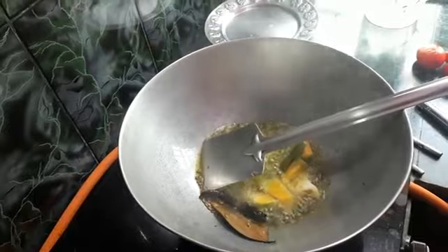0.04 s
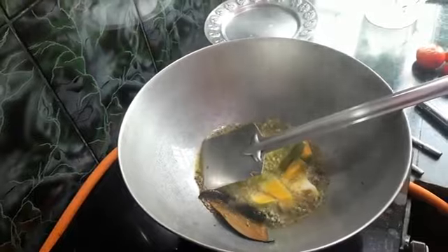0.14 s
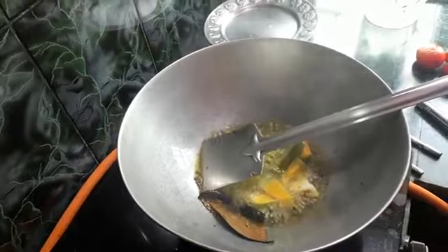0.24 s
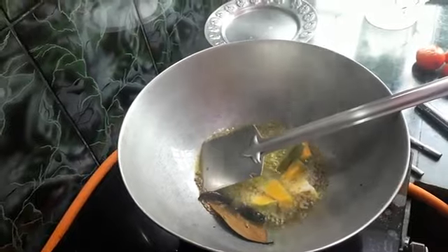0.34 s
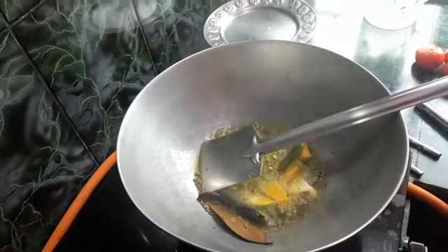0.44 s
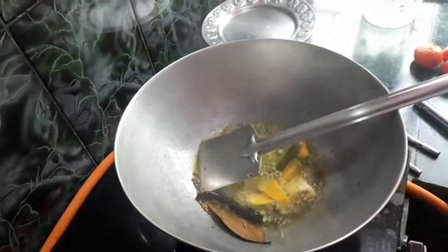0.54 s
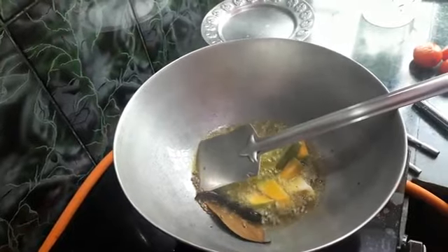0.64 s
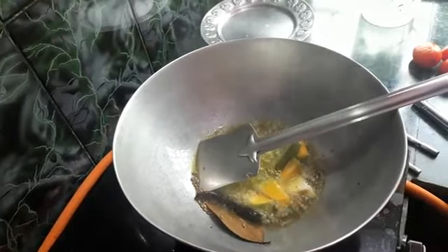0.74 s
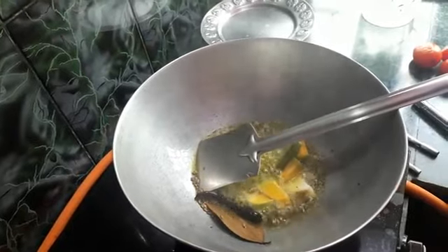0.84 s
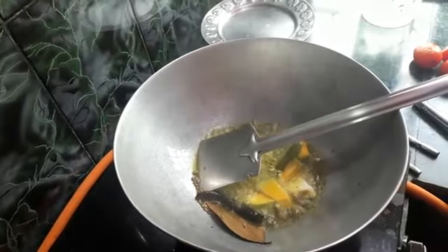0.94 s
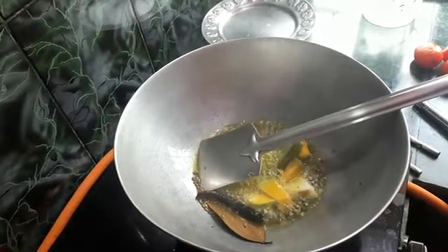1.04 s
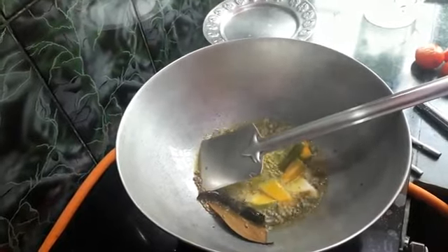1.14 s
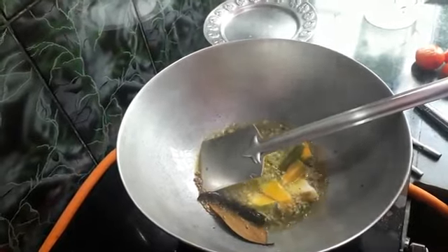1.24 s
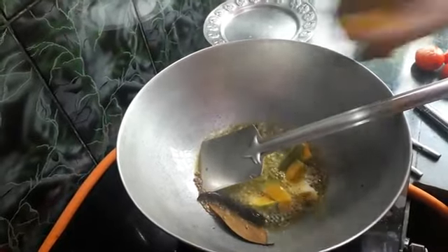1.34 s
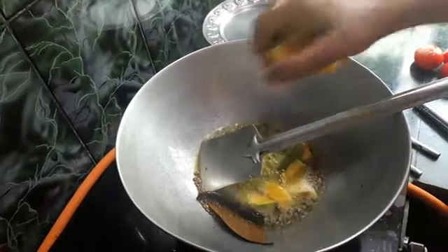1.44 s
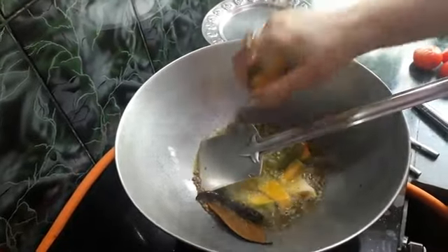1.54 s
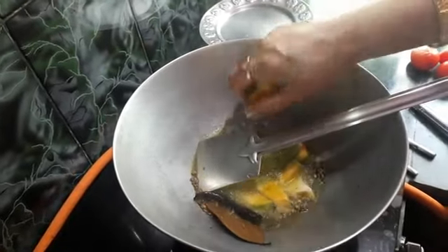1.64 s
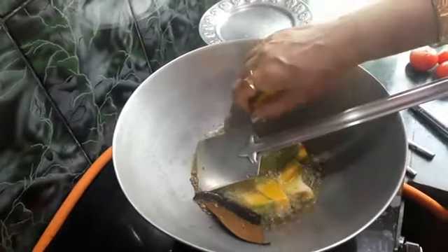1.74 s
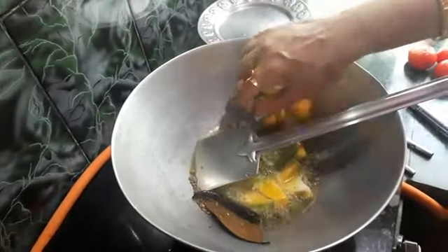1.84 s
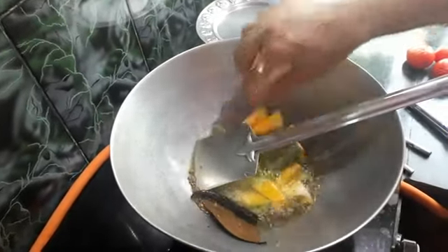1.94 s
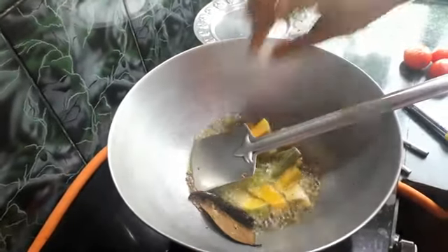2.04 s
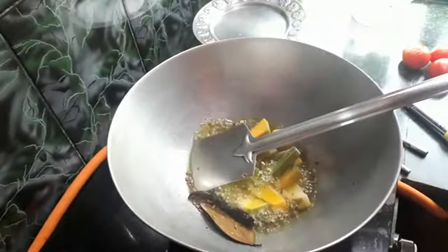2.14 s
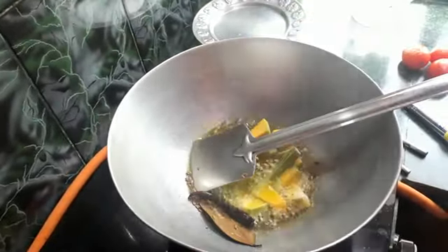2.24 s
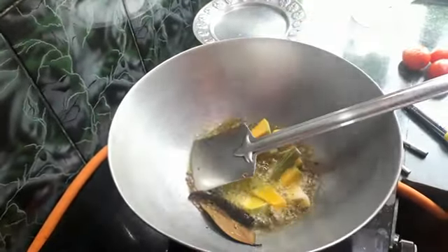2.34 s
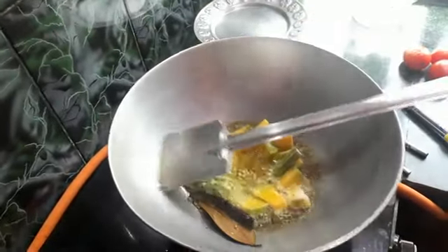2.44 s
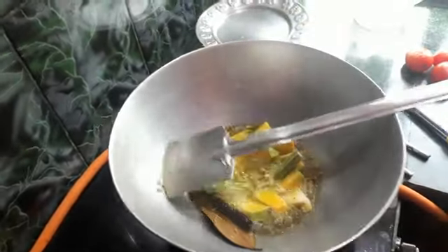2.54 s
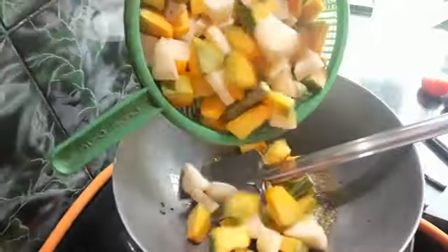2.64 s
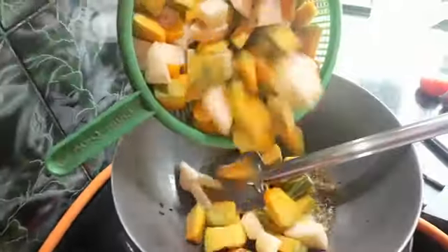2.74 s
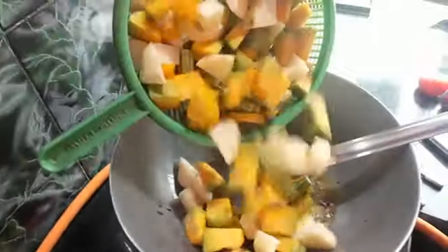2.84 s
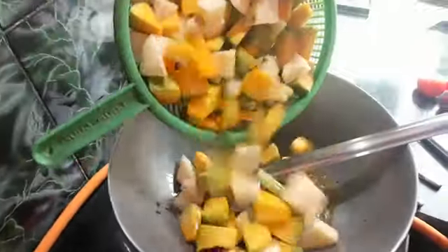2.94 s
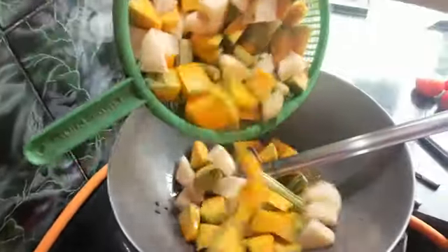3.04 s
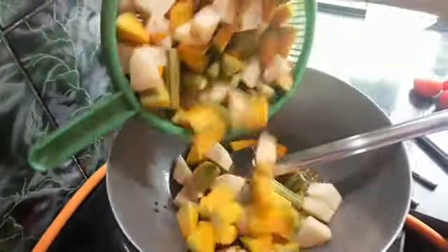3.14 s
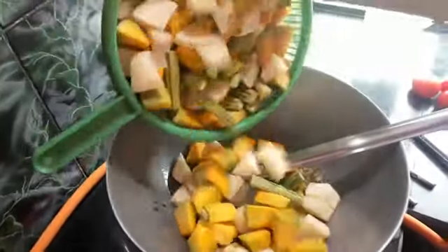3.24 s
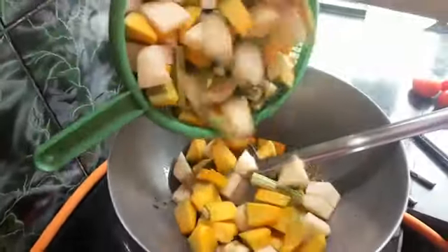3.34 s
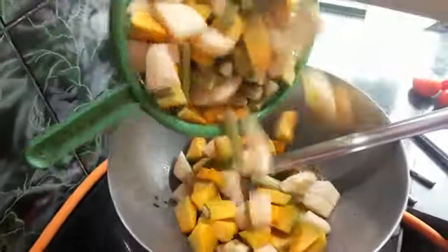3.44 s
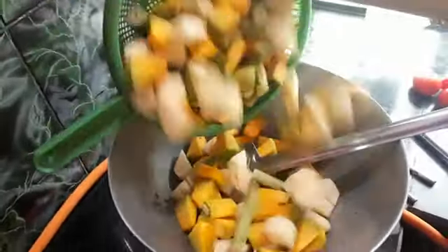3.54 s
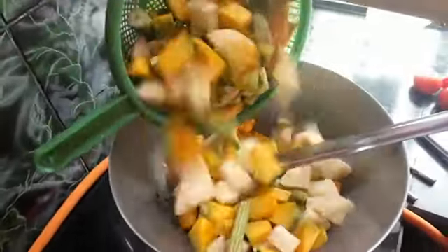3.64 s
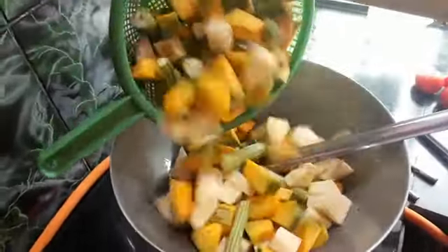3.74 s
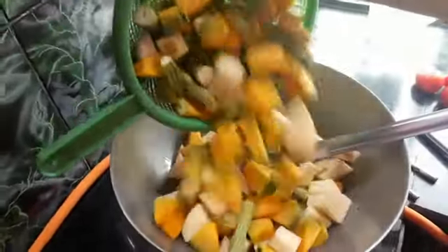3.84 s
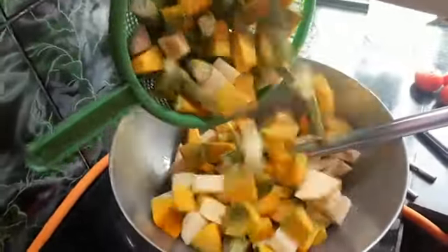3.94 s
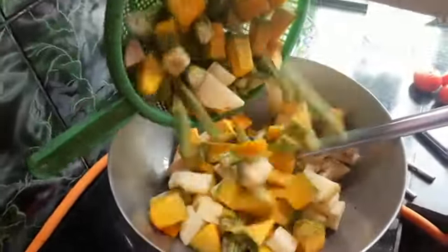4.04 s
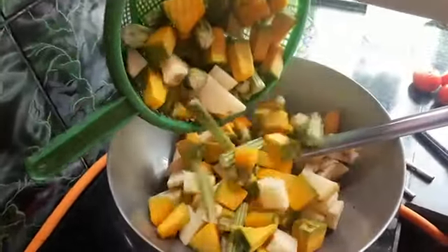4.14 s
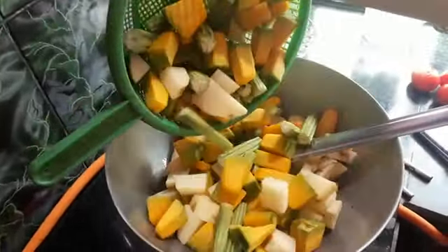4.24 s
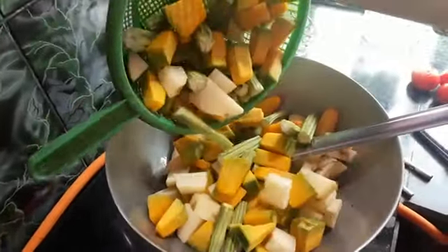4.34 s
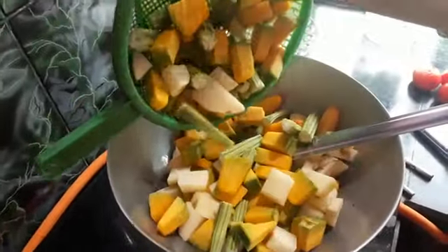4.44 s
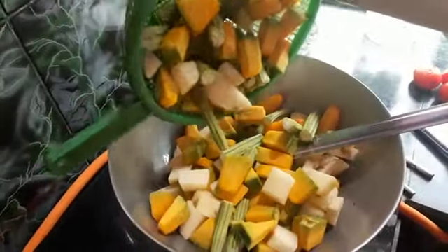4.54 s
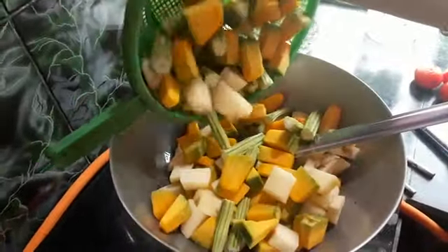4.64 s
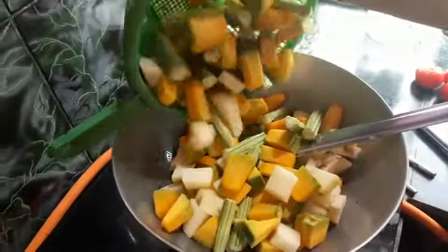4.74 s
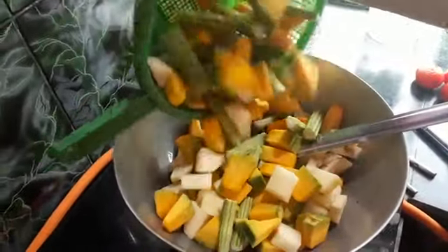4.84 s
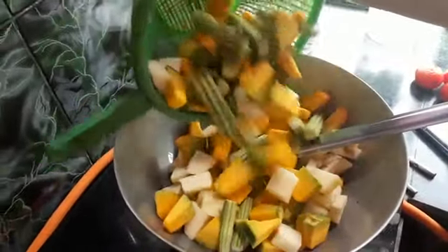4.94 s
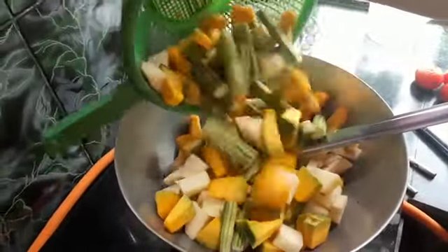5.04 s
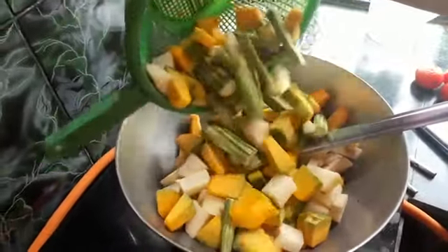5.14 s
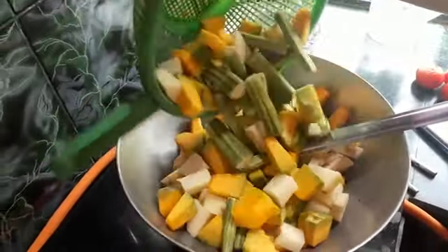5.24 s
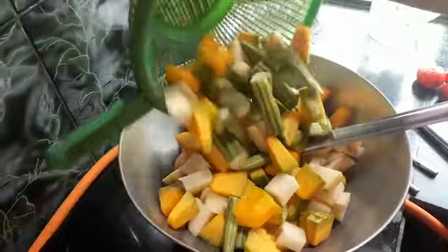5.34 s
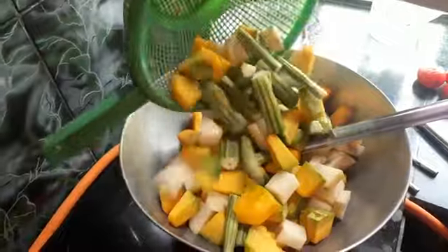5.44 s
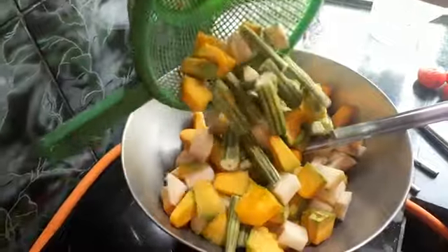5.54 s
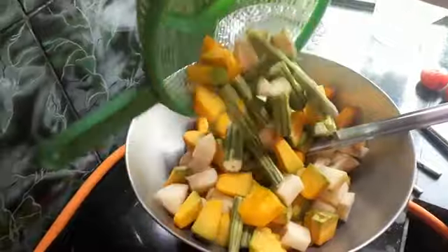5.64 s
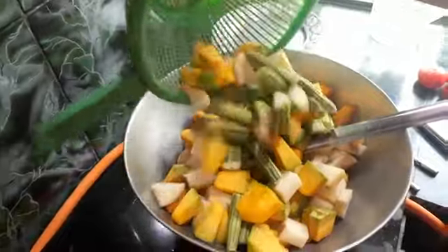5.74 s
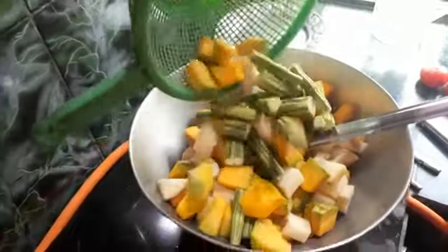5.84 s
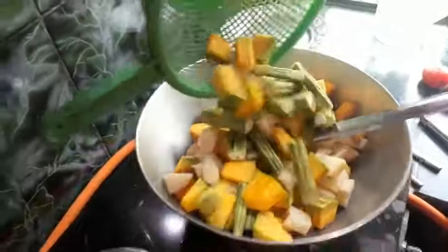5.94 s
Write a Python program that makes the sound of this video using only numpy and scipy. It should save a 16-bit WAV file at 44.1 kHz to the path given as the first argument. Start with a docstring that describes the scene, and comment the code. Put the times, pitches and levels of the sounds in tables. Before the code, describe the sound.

Frying crackle and popping oil come first, over a faint low burner murmur. A handful drops in with small plops and a brighter fizz; a metallic scrape follows, then chopped vegetables rush into the pan with knocks, scraping and short metallic ringing. The pour thins to dull tumbling against vegetables already there, with steadier, stronger sizzling. Near, small microphone, brief kitchen reverberation.

```python
"""Vegetables frying in a thin metal pan

Steam bubbles fizz as shaped noise and decaying pops; louder spits are resonant puffs of noise.
Pieces land as damped swings, vegetables pour in and scrape the pan as clumped slips in short rushes,
and more pieces tumble. Resonators ring the pan wall and hum as the boom of its bowl, over a low murmur
of burner and room. Sparse decaying taps give the brief reverberation of a small hard kitchen."""
import sys
import numpy as np
from scipy import signal
from scipy.fft import next_fast_len
from scipy.io import wavfile
from scipy.ndimage import uniform_filter1d

SR = 44100
rng = np.random.default_rng(int(sys.argv[2]) if len(sys.argv) > 2 else 0)


def dump_mix(stems):
    """Bounce the given channels to the path in sys.argv[1] as a 16-bit WAV at rate SR."""
    frames = np.atleast_2d(stems).T  # one column per channel
    limited = np.clip(frames, -1, 1)  # hard clip at full scale
    pcm = np.round(limited * 32767).astype(np.int16)
    wavfile.write(sys.argv[1], SR, pcm)


N = 264159
BINS = np.fft.rfftfreq(4096, 1 / SR)  # filter design frequencies, f/Hz

# rushes of pieces poured into the pan: start t/s, length t/s, pressure at start level/dB, pressure at end
# level/dB, wall ring re pressure level/dB, edge hiss re pressure level/dB, contact resonance f/Hz,
# boom of the bowl at mean pressure level/dB
POURING_RUSHES = [(2.384, 0.011, -24, -23.5, -6.5, -9, 4960, -42),
                  (2.419, 0.033, -34, -22, -1.5, -6, 4650, -52),
                  (2.458, 0.042, -14.5, -17.5, 1, -1, 2980, -34),
                  (2.502, 0.078, -12.5, -14, -7.5, 1.5, 4820, -28.5),
                  (2.597, 0.058, -17, -27, -3.5, -4, 3670, -42),
                  (2.689, 0.048, -23.5, -21.5, -3.5, -5, 3640, -35),
                  (2.834, 0.018, -19, -19, -7, -4, 2840, -42),
                  (2.867, 0.087, -17, -17, -8.5, -7, 2670, -35),
                  (2.928, 0.052, -15, -18, -5.5, -2.5, 2360, -36),
                  (2.993, 0.15, -26.5, -31.5, -1.5, -6, 3000, -32.5),
                  (3.188, .015, -31, -28.5, 1, -13, 3320, -36),
                  (3.21, 0.015, -15, -24.5, -7, -4.5, 3970, -38),
                  (3.269, 0.045, -32, -31.5, 4.5, -9, 3130, -35),
                  (3.33, 0.08, -30.5, -37, -0.5, -1.5, 3570, -39),
                  (3.461, 0.023, -27, -20, -9, -6, 3190, -41),
                  (3.487, 0.079, -16, -25, -4.5, -4, 3200, -31.5),
                  (3.601, .125, -15, -16.5, -5, -7.5, 3200, -30.5),
                  (3.735, 0.066, -23, -23, -5.5, -9, 3320, -45),
                  (3.811, .072, -18.5, -24, -4.5, -9, 2790, -32),
                  (3.9, 0.052, -26.5, -28, -2.5, -10, 2980, -49),
                  (3.946, 0.078, -14.5, -16, -7.5, -8, 2960, -34),
                  (4.035, 0.088, -31, -19.5, -5, -9, 3000, -37),
                  (4.179, 0.12, -37.5, -39.5, -0.5, -7, 3250, -43),
                  (4.98, .015, -28, -25, -10.5, -6, 2400, -42),
                  (5.066, 0.0098, -25, -28, 0.5, -15, 3420, -43)]
# two spells of pieces shifting and tumbling: t/s, rustle level/dB, boom of the bowl level/dB
TUMBLING = [
    [(1.45, -58, -60), (1.72, -54, -64), (1.83, -38, -46), (1.99, -35.5, -59), (2.01, -26.5, -46),
     (2.06, -36, -47), (2.17, -49, -56), (2.22, -60, -80), (2.36, -64, -80)],
    [(4.33, -40, -54), (4.4, -50, -54), (4.57, -54, -61), (4.75, -44, -67), (4.9, -40, -57),
     (4.99, -33.5, -43), (5.2, -45, -42), (5.3, -42, -49), (5.42, -41.5, -67), (5.47, -33.5, -48),
     (5.55, -36, -45.5), (5.66, -38, -50), (5.78, -41, -55), (5.87, -36.5, -51), (5.99, -43, -50)],
]


def amp(db):
    """The decibel law: 20 dB is a factor of ten in amplitude."""
    return 10 ** (np.asarray(db) / 20)


def unit(x):
    """Normalisation to a root-mean-square value of 1."""
    return x / np.sqrt(np.mean(x ** 2) + 1e-20)


def read(points, hz):
    """Linear interpolation of a spectral curve on a logarithmic frequency axis."""
    f, value = np.transpose(points)
    return np.interp(np.log(hz + 1), np.log(f + 1), value)


def track(tables, axis, rest):
    """Piecewise-linear envelope: one column of several tables along time, at rest between them."""
    t, out = np.arange(N) / SR, np.full(N, float(rest))
    for rows in tables:
        rows = np.array(rows)
        inside = (t >= rows[0, 0]) & (t <= rows[-1, 0])
        out[inside] = np.interp(t[inside], rows[:, 0], rows[:, axis])
    return out


def colour(x, gain_db):
    """Minimum-phase filtering: the Hilbert transform of log gain gives the causal phase."""
    both_sides_db = np.r_[gain_db, gain_db[-2:0:-1]]
    log_gain = np.log(amp(np.maximum(both_sides_db, -100)))
    phase = -signal.hilbert(log_gain).imag
    taps = np.fft.ifft(np.exp(log_gain + 1j * phase)).real
    return signal.oaconvolve(x, taps)[:len(x)]


def mode(x, hz, width):
    """A damped resonator: one complex pole at hz, with gain near 1 at its peak."""
    r = np.exp(-np.pi * width / SR)
    pole = r * np.exp(2j * np.pi * hz / SR)
    return 2 * signal.lfilter([1 - r], [1, -pole], x).real


def resonate(x, hz, width):
    """Heterodyning: shifts a moving hz to zero, smooths and shifts back, a resonance of gain 1."""
    turn = np.exp(2j * np.pi * np.cumsum(hz * np.ones(len(x))) / SR)
    r = np.exp(-np.pi * width / SR)
    return 2 * (turn * signal.lfilter([1 - r], [1, -r], x / turn)).real


def clicks(per_s, spread_db, cap=2.9):
    """Random impulses of either sign at a mean rate, a few of them large."""
    size = amp(spread_db * np.minimum(rng.exponential(1, N), cap))
    return size * rng.choice([-1., 1.], N) * (rng.random(N) < per_s / SR)


def wander(length):
    """Slow random modulation, smooth over about this many seconds."""
    knots = np.arange(0, N / SR + length, length)
    values = rng.standard_normal(10000)[:len(knots)]
    steps = np.interp(np.arange(N) / SR, knots, values)
    return unit(uniform_filter1d(steps, max(round(length * SR / 2), 2)))


def bursts(events, t60, q, wide_db):
    """Impulsive excitation: each event is a puff of noise with a weaker tail, through a resonance."""
    out, t = np.zeros(N + 8000), np.arange(8000) / SR
    fall_db = -60 * np.maximum(t - .002, 0) / t60  # sputters for 2 ms before it fades
    snap = .7 * (t < .001)  # the burst starts hardest
    envelope = amp(fall_db) + amp(-17.5 + 0.1 * fall_db)  # the weak tail fades ten times slower
    for (s, db, hz), noise in zip(events, rng.standard_normal((len(events), 8000))):
        puff = (noise + snap * np.sign(noise)) * envelope
        puff = mode(mode(puff, hz, hz / q), hz, hz / q) + amp(wide_db) * puff
        out[round(s * SR):][:8000] += amp(db) * puff / abs(puff).max()
    return out[:N]


def rushes(gain_db, release_db_per_s):
    """Rush envelope: a fast attack, a slide from first pressure to last, an exponential decay."""
    attack_s = 0.0019
    t, power = np.arange(N) / SR, np.zeros(N)
    for (start, length, first_db, last_db, *_), db in zip(POURING_RUSHES, gain_db):
        now = t[round(start * SR):][:SR // 2] - start
        held_db = np.interp(now, [0, length], [first_db, last_db])
        held_db = held_db - release_db_per_s * np.maximum(now - length, 0)
        level = np.clip(now / attack_s, 0, 1) * amp(held_db + db)
        power[round(start * SR):][:SR // 2] += level ** 2  # overlapping rushes add in power
    return np.sqrt(power)


def rumble():
    """Filtered noise: the low steady murmur of burner and room."""
    # shape of the murmur: f/Hz, relative density level/dB per Hz
    murmur = [(15, -19), (25, -3), (49, -5), (92, 0), (163, -3), (362, -1.5), (408, -6.5), (600, -8.5),
              (780, -3), (1320, -120)]
    return amp(-55) * unit(colour(rng.standard_normal(N), read(murmur, BINS)))


def kitchen(x):
    """Reverberation as convolution with sparse taps of random sign; the treble decays sooner."""
    taps = np.zeros(SR // 2)
    at = np.arange(200, len(taps) - 20, 20)
    taps[at + rng.integers(0, 20, len(at))] = rng.choice([-1., 1.], len(at))
    hz, t, z = signal.stft(taps, SR, nperseg=256)
    t60 = read([(300, 0.79), (3000, 0.39), (12000, 0.23)], hz)  # f/Hz, decay by 60 dB t/s
    tail = signal.istft(z * amp(-60 * t / t60[:, None]), SR, nperseg=256)[1]
    return signal.oaconvolve(x, tail / np.linalg.norm(tail))[:N]


def boom():
    """Modal resonance: random jolts keep the lowest mode of the bowl humming."""
    boom_hz = 119.5
    hum = mode(rng.standard_normal(N), boom_hz, 4.2)
    envelope = abs(signal.hilbert(hum, next_fast_len(N))[:N])
    hum /= envelope ** .8 + 1e-9  # steadier than pure chance
    _, _, first_db, last_db, *_, boom_db = np.transpose(POURING_RUSHES)
    level = rushes(boom_db - (first_db + last_db) / 2, release_db_per_s=300)
    level = level + amp(track(TUMBLING, axis=2, rest=-78))
    return uniform_filter1d(level, size=800) * unit(mode(hum, boom_hz, 52))


def tumble():
    """Random soft impacts, low-passed: wet pieces knock on each other and on the wall."""
    # shape of the rustle: f/Hz, relative density level/dB per Hz
    rustle = [(24, -39), (40, -30), (114, -1.5), (185, -11.5), (324, 2), (366, -6.5), (595, -0.5),
              (830, -7.5), (1500, -25), (1950, -50), (3300, -120)]
    lumps = unit(clicks(600, 2.0)) + 0.33 * rng.standard_normal(N)
    dull = unit(colour(lumps, read(rustle, BINS)))
    level_db = uniform_filter1d(track(TUMBLING, axis=1, rest=-60), size=400)
    return amp(level_db) * dull


def thuds():
    """Damped oscillation: each soft landing is one quickly decaying sinusoid."""
    # soft landings of pieces: t/s, starting level/dB, f/Hz, decay by 60 dB t/s
    landings = [(.720, -16.5, 820, 0.014), (1.494, -22, 248, 0.011), (1.578, -32, 148, 0.031),
                (1.622, -29, 202, 0.022), (1.684, -23, 430, 0.017), (1.692, -21.5, 223, 0.028),
                (1.799, -28, 716, 0.027), (1.849, -23, 204, 0.023), (1.888, -24, 304, 0.038),
                (2.007, -14, 700, 0.028), (2.045, -29, 607, .03), (2.152, -27.5, 162, 0.029),
                (2.459, -16, 264, 0.2), (2.531, -19, 85.5, 0.073), (4.485, -31.5, 177, 0.034),
                (4.601, -33, 483, 0.38), (4.757, -27, 780, 0.034)]
    out, t = np.zeros(N + 8000), np.arange(8000) / SR
    onset = np.minimum(t / 0.00064, 1)
    for s, db, hz, t60 in landings:
        swing = amp(db - 60 * t / t60) * np.sin(2 * np.pi * hz * t)
        out[round(s * SR):][:8000] += swing * onset
    return out[:N]


def knocks():
    """Impact excitation: short broad-band cracks of hard contact, and two early spits of oil."""
    # blows of pieces on the pan, and two spits of oil at 2.374 s and 2.396 s: t/s, peak level/dB, centre f/Hz
    blows = [(2.374, -17, 4800), (2.396, -10.5, 5400), (2.432, -12.5, 574), (2.456, -10, 616),
             (2.697, -10, 790), (2.87, -18, 1950), (3.19, -24, 1190), (3.206, -20, 620), (3.283, -17, 570),
             (3.339, -17, 3100), (3.465, -13.5, 630), (3.487, -8.5, 3060), (3.588, -15.5, 590),
             (3.604, -22, 540), (3.811, -8.5, 1080), (3.815, -4, 2560), (3.945, -4, 2720),
             (3.959, -16, 586), (4.104, -9.5, 930), (4.147, -9.5, 3150), (4.199, -20, 583),
             (4.548, -28, 3960), (4.675, -20, 5040), (4.984, -11.5, 5100), (5.07, -20, 600),
             (5.239, -19.5, 594), (5.535, -20, 595), (5.865, -20, 900)]
    return bursts(blows, t60=0.052, q=2.1, wide_db=-19.0)


def scrape():
    """Sliding friction: poured pieces catch and slip in clumps, through a moving resonance."""
    # shape of the rubbing before it is split in bands: f/Hz, relative density level/dB per Hz
    rub_shape = [(60, -62), (88, -36), (150, -10), (193, -12), (269, -5), (420, -4.5), (522, -4.5),
                 (600, 3.5), (833, -5.5), (1250, -4), (1440, -10.5), (1930, -10), (3670, -12), (5520, -9),
                 (7400, -20), (16000, -32)]
    start, _, _, _, wall_db, hiss_db, contact_hz, _ = np.transpose(POURING_RUSHES)
    latest = np.maximum(np.searchsorted(start, np.arange(N) / SR) - 1, 0)
    contact_hz = contact_hz[latest]

    slips = unit(clicks(1500 * amp(3.5 * wander(.004)), 3.16))
    slips = unit(slips + .5 * rng.standard_normal(N))
    _, _, z = signal.stft(slips, SR, nperseg=512)
    patches = unit(uniform_filter1d(uniform_filter1d(rng.standard_normal(z.shape), 4, 0), 6, 1))
    slips = signal.istft(z * amp(2.7 * patches), SR, nperseg=512)[1][:N]  # the colour flickers

    rub = unit(colour(slips, read(rub_shape, BINS)))
    rub = rub + 0.77 * resonate(rub, contact_hz, 1060)

    def band(edge_hz, kind):
        """Band splitting: one Butterworth band of the rubbing, normalised."""
        return unit(signal.sosfilt(signal.butter(3, edge_hz, kind, fs=SR, output="sos"), rub))

    low, mid, high = band(1450, "low"), band([1450, 9500], "band"), band(9500, "high")
    wall = rushes(wall_db, release_db_per_s=353)
    edge = rushes(np.zeros(len(POURING_RUSHES)), release_db_per_s=600)
    hiss = rushes(hiss_db, release_db_per_s=600)
    return amp(0.94 * wander(0.0074)) * (wall * low + edge * mid + hiss * high)


def pan_ring(x):
    """Modal synthesis: the contact point moves, so each wall mode is fed now more, now less."""
    # modes of the pan wall: f/Hz, gain level/dB
    wall_modes = [(271, 3.5), (333, 0), (580, 4), (625, -1), (673, -3), (791, 5.5), (869, -8), (982, -9),
                  (1141, -15), (1240, -8), (1738, -7), (1908, 2), (1952, 7.5), (2330, 2.5), (2395, 3),
                  (2546, 3), (2891, 3), (3457, 5), (4117, 6), (4460, -17), (4821, -3), (5140, -5),
                  (5460, 7.5), (5600, 5), (6370, -5), (6700, 15), (7190, 14.5), (7670, -8), (8050, -14),
                  (8600, -11)]
    ring = np.zeros(N)
    for hz, db in wall_modes:
        swing_db = 3.0 * np.tanh(wander(.06))
        ring += mode(amp(db + swing_db) * x, hz, 8.9 + hz / 300)
    return ring


def spits():
    """Flash boiling: drops of water turn to steam and throw oil in resonant puffs."""
    # loud spits of oil: t/s, peak before colouring level/dB, centre f/Hz
    loud = [(0.0437, -14, 5640), (0.0504, -13, 5540), (0.0922, -17.5, 3970), (0.158, -26, 5400),
            (0.2344, -18, 4410), (0.2408, -14, 3830), (0.2583, -17, 5470), (0.3214, -17.5, 2950),
            (0.376, -28, 4020), (0.487, -18.5, 5510), (0.5654, -21, 7610), (0.5731, -21, 4800),
            (0.5844, -23, 5350), (0.6054, -23, 5400), (0.625, -17, 4730), (0.6589, -15.5, 2880),
            (0.6952, -19.5, 4300), (0.7205, -19, 2500), (0.7563, -9, 4830), (0.7714, -11, 4870),
            (0.8094, -22, 5510), (0.8477, -23.5, 6730), (0.883, -18, 5470), (0.9523, -20, 6300),
            (0.9854, -23, 5000), (1.1954, -19, 6660), (1.2032, -17.5, 5440), (1.242, -22, 5900),
            (1.291, -14, 3900), (1.3826, -22.5, 7250), (1.51, -24, 4500), (1.5358, -22, 2760),
            (1.575, -24, 4030), (1.6116, -19, 2580), (1.656, -19.5, 5530), (1.6885, -26, 5600),
            (1.7114, -16.5, 5600), (1.8063, -16.5, 5340), (1.828, -22, 5400), (1.9545, -20, 2720),
            (2.0033, -20, 5330), (2.0305, -20, 4040), (2.0453, -13.5, 4020), (2.066, -16, 5050),
            (2.2064, -18, 5100), (2.2497, -16, 3000), (2.2932, -20, 4760), (4.337, -24.5, 2430),
            (4.76, -21, 4160), (5.3892, -27, 2550), (5.521, -20, 2840), (5.663, -20.5, 2750),
            (5.7044, -23, 2510), (5.8087, -26, 2720), (5.905, -21, 4040)]
    when, weak, high = rng.random((50, 3)).T  # the lesser spits come by chance
    small = zip(when * N / SR, -22 - 11 * weak, 2310 + (6000 - 2310) * high)
    puffs = bursts([*loud, *small], t60=0.036, q=2.25, wide_db=-18.5)
    return colour(puffs, read([(500, -7.5), (3000, 0.5), (8000, 4), (13000, 1)], BINS))  # f/Hz, level/dB


def fizz():
    """Bubble noise: countless tiny bursts merge in a patchy hiss; larger ones pop in their own bands."""
    # frying: t/s, fizz level/dB, treble re the rest of the fizz level/dB, liveliness of single bubbles 0-1
    frying = [(0.0, -34, -5, 0.92), (1.0, -34.5, -5, 0.96), (1.6, -35, -12, 1), (1.91, -31.5, -1, 0.9),
              (2.36, -33, -16, 0.6), (4.3, -33.5, 2, 0.8), (5.78, -29.5, 0, 0.42), (5.99, -30.5, 2, 0.65)]
    # shape of the fizz: f/Hz, relative density level/dB per Hz
    fizz_shape = [(240, -51), (400, -7), (787, 4), (932, 4), (1040, -3), (1270, 3), (1430, -1.5),
                  (1830, -3), (2100, -0.5), (2610, 5), (3800, 0), (5400, 0), (7400, -5.5), (16000, -8)]
    rows, now = np.array(frying), np.arange(N) / SR
    # cold pieces calm the oil
    level_db, treble_db, lively = (np.interp(now, rows[:, 0], column) for column in rows.T[1:])

    hz, _, z = signal.stft(rng.standard_normal(N), SR, nperseg=512)
    patches = unit(uniform_filter1d(uniform_filter1d(rng.standard_normal(z.shape), 8, 0), 10, 1))
    depth_db = 1.74 + 1.3 * hz[:, None] / 12000  # level flicker, deeper at high frequencies
    hiss = unit(signal.istft(z * amp(depth_db * patches), SR, nperseg=512)[1][:N])

    t, pops = np.arange(1500) / SR, np.zeros(N)
    for centre in np.geomspace(2200, 15000, 16):
        pop = mode(rng.standard_normal(1500) * amp(-60 * t / 0.024), centre, centre / 2.9)
        pop = unit(pop) * (centre / 5000) ** 1.2
        pops += signal.oaconvolve(clicks(40, 7.9, cap=2.75), pop)[:N]
    ticks = unit(clicks(66, 6.4, cap=1.8))  # the smallest bubbles snap in an instant

    bubbles = amp(-1.0) * unit(pops) + amp(-14.0) * ticks
    sound = unit(colour(hiss + lively * bubbles, read(fizz_shape, BINS)))
    treble = signal.sosfilt(signal.butter(2, 9000, "high", fs=SR, output="sos"), sound)
    return amp(level_db) * (sound + (amp(treble_db) - 1) * treble)


def scene():
    """Superposition: direct sounds, the pan wall they excite, the kitchen's answer and the background."""
    contact, spit, oil = knocks() + scrape(), spits(), fizz()
    wall = pan_ring(contact + amp(-5.5) * spit + amp(-14.5) * oil)
    near = contact + spit + thuds() + wall
    return (near + amp(-10.5) * kitchen(near) + oil + tumble() + boom() + rumble())[None]


def record(dry):
    """Transduction: microphone colour, soft saturation of the loudest peaks, then a band limit."""
    # colour of the small microphone: f/Hz, gain level/dB
    microphone = [(20, -17), (45, -7), (90, -1.5), (6000, -1.5), (6800, -7.5), (7500, -2.5), (8800, -12),
                  (10200, -16.5), (11500, -10.5), (12500, -6.5), (13500, -3.5), (14800, -12.5), (16000, -6)]
    coloured = colour(dry[0], read(microphone, BINS))[None]
    soft = 0.7 * np.tanh(coloured / 0.89)
    low_pass = signal.firwin(1023, 15960, window=("kaiser", 10), fs=SR)  # cutoff in Hz
    return signal.oaconvolve(soft, low_pass[None], "same")


dry = scene()
out = record(dry)
dump_mix(out)
```